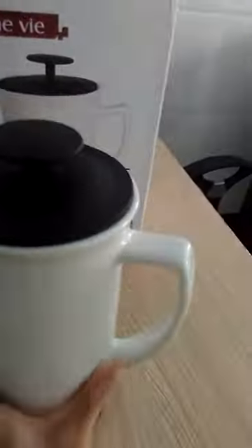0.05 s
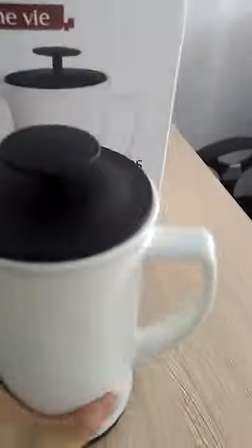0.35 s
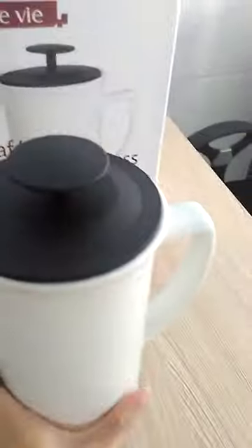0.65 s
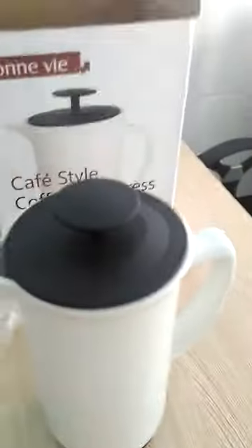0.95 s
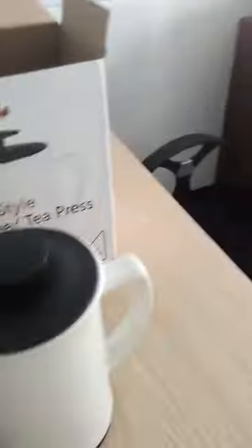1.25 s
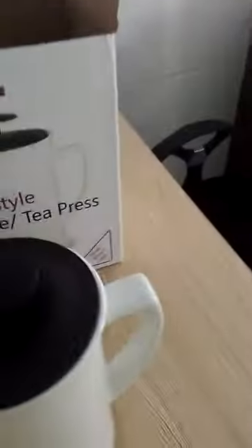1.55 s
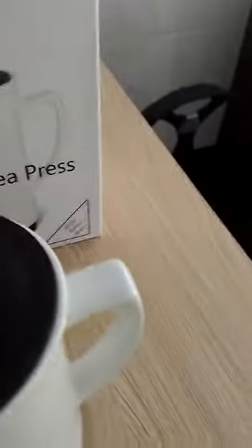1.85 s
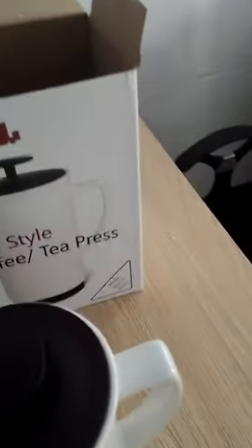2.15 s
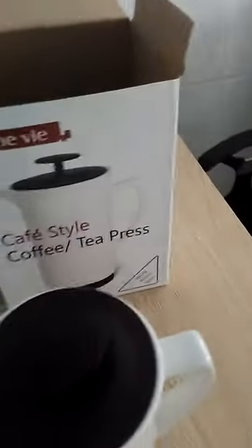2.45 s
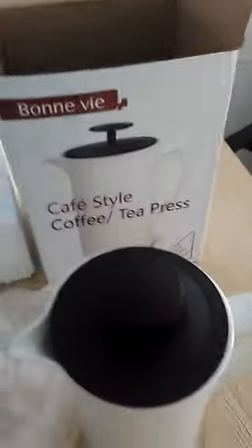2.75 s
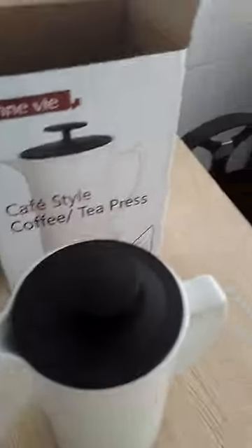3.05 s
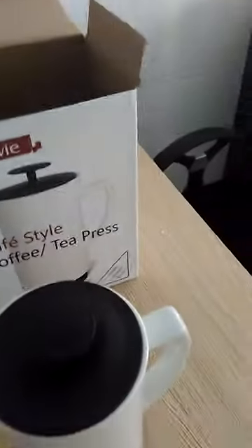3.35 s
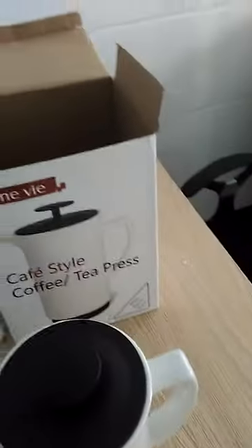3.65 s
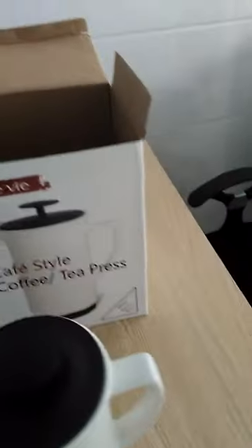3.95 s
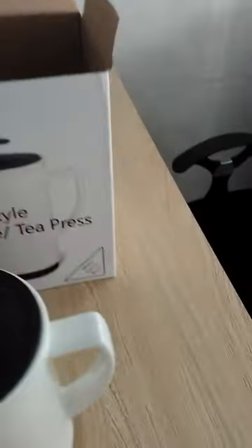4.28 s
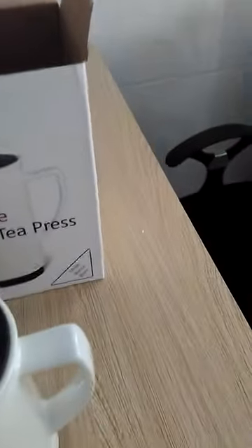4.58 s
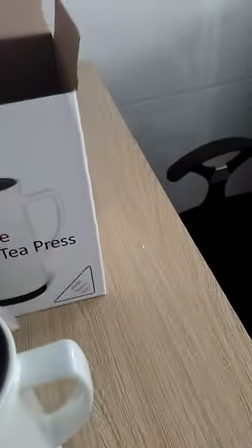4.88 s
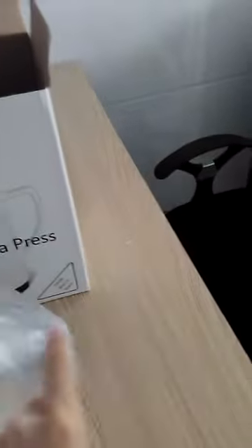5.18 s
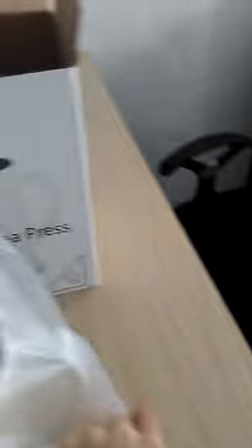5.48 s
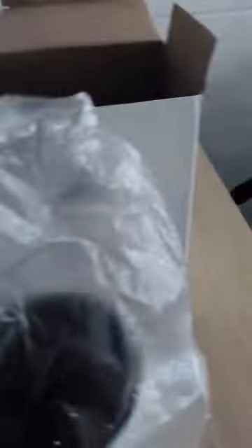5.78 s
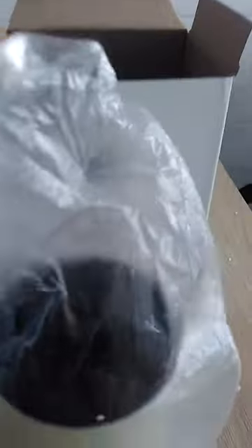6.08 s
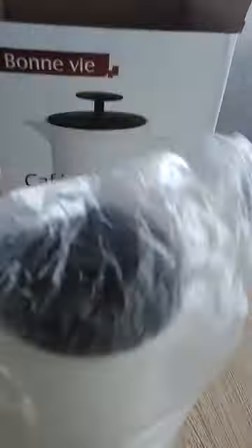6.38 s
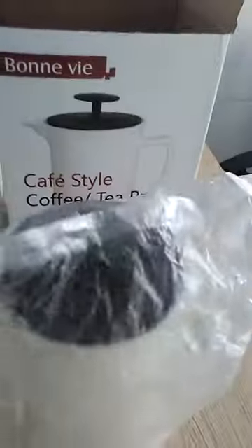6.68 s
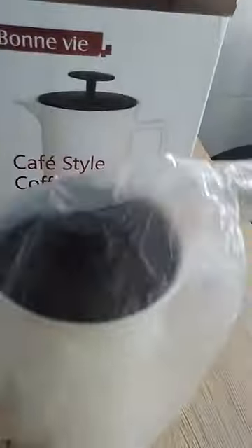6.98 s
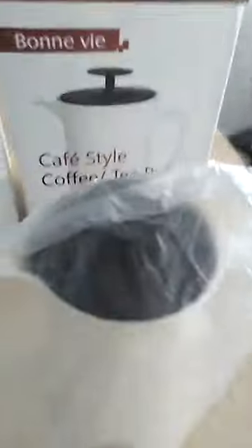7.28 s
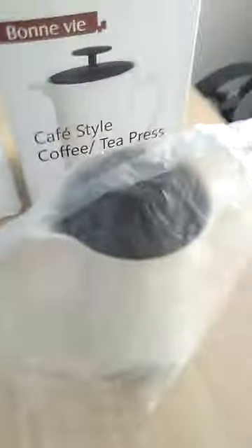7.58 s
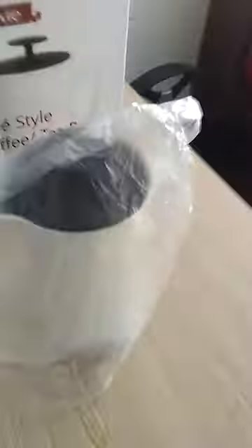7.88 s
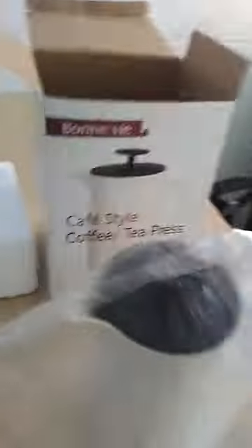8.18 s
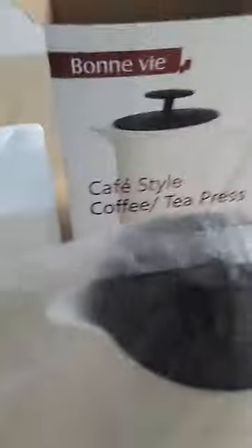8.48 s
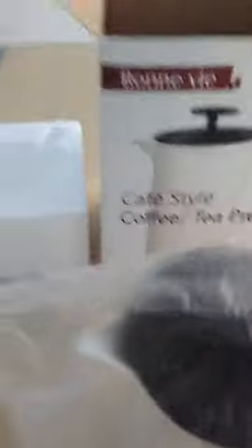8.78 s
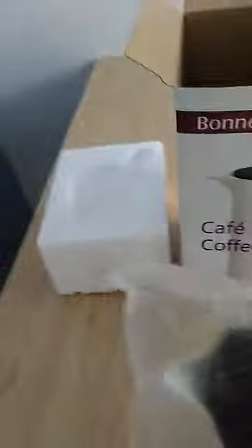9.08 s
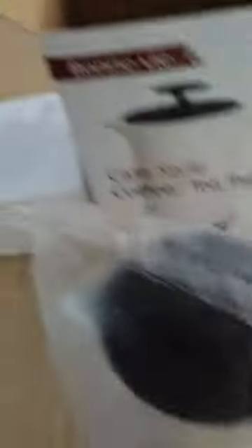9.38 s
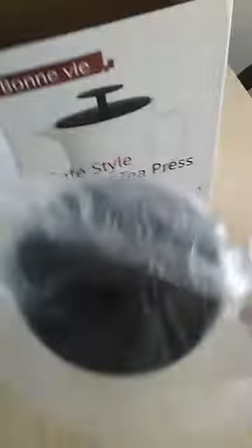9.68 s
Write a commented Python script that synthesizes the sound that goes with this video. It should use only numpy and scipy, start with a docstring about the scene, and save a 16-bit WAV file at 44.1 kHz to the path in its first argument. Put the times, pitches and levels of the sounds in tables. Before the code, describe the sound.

A thin plastic bag rustles close to a hand-held microphone in a small, quiet room. After a soft start and a light clack from a ceramic coffee press, it crinkles in repeated hissy pulls. The pot and lid knock lightly on a wooden table a few times. Late on, the plastic brushes the microphone's left side with two sharp snaps, then rustles on over faint handling rumble.

```python
"""A thin plastic bag is rustled and pulled over a ceramic coffee press, close to a hand-held microphone.
Tiny creases buckle into a hiss coloured by broad folds and a pocket of air; for a second the bag's loose
end brushes the left microphone port. Pot and lid knock lightly on a wooden table in a small room, and
the ceramic sings faintly under the film. The hand holding the recorder rumbles over the room tone."""
import sys
import numpy as np
from scipy import signal
from scipy.fft import rfft, irfft, next_fast_len
from scipy.io import wavfile

SR = 44100
rng = np.random.default_rng(int(sys.argv[2]) if len(sys.argv) > 2 else 0)


def persist_wave(psi):
    """Save psi, clipped to +-1, as 16-bit WAV."""
    counts = np.round(np.clip(psi, -1, 1) * 32767).astype(np.int16)
    wavfile.write(sys.argv[1], SR, np.atleast_2d(counts).T)


N = 433503
N_FFT, CONTROL_HOP = next_fast_len(N), 40
TIME_S = np.arange(N) / SR
CONTROL_S = TIME_S[::CONTROL_HOP]
BINS_HZ = np.maximum(np.arange(N_FFT // 2 + 1) * SR / N_FFT, 1)


# pulls on the bag: start_s, attack_s, hold_s, fall_db_per_s, level_db, fold_boost_db
PULLS = [(0.005, 0.013, 0.52, 102, -54, -5), (0.69, 0.21, 0.04, 8, -45, -10),
         (1.044, 0.03, 0.1, 47, -41, 1.5), (1.675, 0.058, 0.044, 162, -29.5, -12),
         (1.742, 0.045, 0.002, 36.5, -18.5, 4.5), (1.92, 0.093, 0.04, 121.5, -21, -1),
         (2.022, 0.17, 0.14, 36, -24.5, -1), (2.39, 0.075, 0.049, 60, -34.5, -3),
         (2.476, 0.1, 0.0036, 200, -21.5, -1), (2.592, 0.093, 0.2, 49.5, -21, 2),
         (2.703, 0.033, 0.025, 148, -20, -8), (2.902, 0.1, 0.019, 128, -21, -0.5),
         (3.058, 0.057, 0.055, 21, -24.5, 0), (3.14, 0.3, 0.06, 25.5, -25, -5),
         (3.667, 0.021, 0.078, 200, -39.5, 7.5), (3.934, 0.19, 0.007, 34.5, -28.5, -1),
         (4.24, 0.019, 0.00085, 204, -42, 7.5), (4.29, 0.33, 0.06, 75, -22.5, -6),
         (4.658, 0.063, 0.056, 107, -22.5, 3.5), (4.801, 0.041, 0.11, 100, -35.5, 5.5),
         (4.866, 0.37, 0.28, 163, -22.5, 3), (4.93, 0.071, 0, 150, -26.5, 1),
         (5.19, 0.034, 0.062, 150, -28, 2), (5.498, 0.17, 0.0044, 86, -23, 3),
         (5.772, 0.011, 0.017, 250, -26, -0.5), (5.845, 0.028, 0.0095, 211, -25.5, -4.5),
         (5.957, 0.021, 0.023, 120, -47.5, 17), (6.042, 0.22, 0.25, 128, -19, -0.5),
         (6.067, 0.02, 0.061, 302.5, -19.5, -0.5), (6.238, .025, 0.00024, 249, -24, 2),
         (6.388, 0.036, 0, 330, -17, 1.5), (6.746, 0.011, 0.155, 251, -27, -5),
         (6.795, 0.14, 0.0024, 60, -21, 5), (6.908, .04, 0.038, 200, -23.5, 8),
         (7.005, .02, 0.058, 299, -26, 2), (7.057, 0.14, 0, 137, -21, 1.5), (7.42, .05, 0.16, 40, -51, 4),
         (7.53, 0.35, 0.19, 154, -38, 4), (8.124, 0.031, 0.17, 89, -51, 9),
         (8.359, 0.0087, 0.046, 246, -33, -5), (8.383, 0.0093, 0.13, 87, -21.5, 4),
         (8.597, 0.02, 0.025, 78, -21.5, 5), (8.717, 0.14, 0.057, 163, -23, -2),
         (8.924, 0.086, 0.0093, 69, -17.5, 5.5), (9.098, 0.14, 0.0061, 127, -23, 8),
         (9.391, 0.016, 0, 29.5, -25, 4), (9.62, 0.1, 0, 121, -22, -2)]

def pulling(resting_db=-57.5):
    """Overlapping pulls add in power; returns the rustle's level and its boost from broad folds, in dB."""
    power = fold_power = from_db(resting_db) ** 2
    for start_s, attack_s, hold_s, fall_db_per_s, level_db, fold_boost_db in PULLS:
        pull = (from_db(level_db) * swell(start_s, attack_s, hold_s, fall_db_per_s)) ** 2
        power = power + pull
        fold_power = fold_power + pull * from_db(fold_boost_db) ** 2
    return per_sample(10 * np.log10(power)), per_sample(10 * np.log10(fold_power / power))


# film spectrum at the ports: freq_hz, left_db, right_db
FILM_SPECTRUM = [(151, -72, -72), (301, -24, -20), (540, -37.5, -44.5), (910, -26, -30.5),
                 (1290, -31, -37.5), (1960, -25, -33), (2730, -22, -25), (3600, -24, -23.5),
                 (5090, -17.5, -18), (7460, -12, -14), (8020, -10, -11.3), (10600, 3.5, -16.5),
                 (13350, -8, -23), (14200, -4.5, -22)]
# air pocket resonance, moving with the bag's shape: time_s, pitch_hz, prominence_db
AIR_POCKET = [(1.8, 2010, 5.5), (2.05, 2250, 2.5), (2.3, 2800, 2.5), (2.7, 2450, 1.5), (3.0, 2750, 1.5),
              (3.22, 2870, 6.5), (3.9, 2610, 5.5), (4.4, 2750, 4), (4.75, 2230, 1), (5.3, 2600, -2.5),
              (5.75, 2780, 2.5), (6.12, 2100, 1.5), (6.37, 2100, 0), (6.43, 2030, 10), (6.56, 2060, 9),
              (7.0, 2400, -2), (8.45, 2200, 5.5), (9.05, 2400, 0.5), (9.7, 2000, 0)]
# bag's lean towards the left port: time_s, right_loss_db
BAG_LEAN = [(0, 3.5), (2.4, 0), (4.2, -2.5), (6.9, -2), (7.35, 0.5), (7.55, 15), (8.1, 9.5), (8.4, 0.5),
            (9.8, 2.5)]
BANDS_HZ = np.r_[500, 750, np.geomspace(950, 5400, 26), 6300, 8000, 10500, 13500]

def bag_rustle(flicker_db, fold_flicker_db, flutter_db, fold_hz, firm_pull_db=-26.5, pocket_octaves=0.11):
    """Dense buckling merges into hiss; folds open and close, so middle bands swell and fade separately."""
    level_db, fold_boost_db = pulling()
    right_loss_db, = in_time(BAG_LEAN)
    pocket_hz, prominence_db = in_time(AIR_POCKET)
    creases_per_s = 30000 * from_db(0.3 * (level_db - firm_pull_db))   # harder pulls buckle more creases
    creases = np.array([buckles(creases_per_s, spread_db=-1.9) for port in range(2)])
    creases /= np.sqrt(np.minimum(creases_per_s, SR))   # level independent of rate
    film = rfft(at_ports(creases, FILM_SPECTRUM).astype(np.float32), N_FFT)
    log_bins = np.log(np.linspace(1, SR / 2, film.shape[1]))
    rustle = 0
    for band_hz, selector in zip(BANDS_HZ, np.eye(len(BANDS_HZ))):
        triangle = np.interp(log_bins, np.log(BANDS_HZ), selector).astype(np.float32)
        band = irfft(film * triangle, N_FFT)[:, :N]
        fold_share = np.exp(-np.log(band_hz / fold_hz) ** 2)
        pocket_db = prominence_db / (1 + (np.log2(band_hz / pocket_hz) / pocket_octaves) ** 2)
        wander_db = (flicker_db + fold_share * fold_flicker_db) * drift(14.4)
        rustle = rustle + band * from_db(pocket_db + fold_share * fold_boost_db + wander_db)
    return rustle * balance(-right_loss_db) * from_db(level_db + flutter_db * drift(28))


# strokes of film over the left port: start_s, end_s, level_db
STROKES = [(7.39, 7.433, -27), (7.442, 7.534, -32), (7.518, 7.614, -50), (7.599, 7.634, -38.5),
           (7.629, 7.67, -32), (7.642, 7.657, -33), (7.667, 7.722, -41.5), (7.687, 7.718, -35.5),
           (7.723, 7.768, -35), (7.778, 7.912, -32.5), (7.881, 7.94, -26), (7.942, 7.985, -34),
           (8.024, 8.05, -33), (8.05, 8.103, -40.5), (8.159, 8.208, -39), (8.237, 8.31, -41)]
# catches on the port's rim: middle_s, half_length_s, level_db
RASPS = [(7.395, 0.0013, -22), (7.4148, .001, -25.5), (7.589, 0.0013, -33), (7.649, .0015, -27.5),
         (7.659, .004, -32), (7.694, 0.0018, -33)]
# sliding film spectrum: freq_hz, level_db
SLIDE_SPECTRUM = [(300, -13.5), (1000, -22), (2000, -19.5), (2800, -21.5), (3600, -11.5), (4150, -12),
                  (4700, -17), (6600, -15), (8500, -6.5), (10500, 3.5), (12500, 0), (14000, -3.5)]

def port_brushing(scratch_db):
    """Film slides over the port in swelling strokes and catches on its rim in short rasps."""
    pressure = sum(from_db(db) * bump(middle_s, half_length_s) for middle_s, half_length_s, db in RASPS)
    for start_s, end_s, level_db in STROKES:
        progress = np.clip((TIME_S - start_s) / (end_s - start_s), 0, 1)
        pressure += from_db(level_db) * np.sqrt(np.sin(np.pi * progress).clip(0))
    creases = rfft(buckles(per_s=30000, spread_db=-1.0), N_FFT)
    slide = unit_rms(irfft(creases * from_db(at_bins(SLIDE_SPECTRUM)[0]), N_FFT)[:N])
    return pressure * from_db(scratch_db * drift(56)) * slide


# creases snapping at the port: time_s, level_db
SNAPS = [(7.6004, -31), (7.6145, -23), (7.738, -25), (7.792, -27), (7.836, -21), (7.9357, 5), (8.035, 2.5),
         (8.0714, -27)]
# crease modes: pitch_hz, level_db, t60_s
CREASE_MODES = [(1840, -22.5, 0.0029), (3550, -32, 0.0084), (4050, -30.5, 0.022), (5200, -12, 0.0011),
                (8700, -3.5, 0.0014), (10700, -1, 0.0016), (13300, -6.5, .0009)]

def port_snaps(low_cut_hz=1340):
    """Single creases snap right at the port and ring briefly."""
    low_cut = signal.butter(2, low_cut_hz, "high", fs=SR, output="sos")
    return signal.sosfilt(low_cut, ring(impulses(*np.transpose(SNAPS)), CREASE_MODES))


# bumps on the port: time_s, level_db, pitch_hz, t60_s
PUFFS = [(7.3969, -27, 350, 0.017), (7.397, -20, 1451, 0.0033), (7.397, -19.5, 3640, 0.012),
         (7.6145, -40, 2100, 0.0033), (7.702, -31.5, 63.3, 0.3), (7.746, -32, 124, 0.072),
         (7.887, -32.5, 129, 0.026), (7.893, -31, 3900, .008), (7.9013, -30, 2000, 0.0046),
         (7.903, -21.5, 5200, .005), (7.911, -27, 4300, .006), (7.921, -30, 3700, .006),
         (7.9487, -29, 2300, 0.0071), (7.96, -29, 170, 0.018), (7.962, -33, 3600, .005),
         (7.968, -35, 5000, .004)]

def port_puffs():
    """Film bumps the port and pushes air into it, one damped sine per bump."""
    return sum(ring(impulses(time_s, db), [(hz, 0, t60_s)]) for time_s, db, hz, t60_s in PUFFS)


# pot's base on the table: time_s, level_db, favoured_hz, room_send_db
THUDS = [(1.352, -44, 400, -8), (1.785, -37.5, 330, -10), (1.8, -35, 260, -8), (5.7064, -30, 380, -5),
         (5.719, -32, 386, -2.5), (5.742, -40, 402.6, -3), (5.778, -45, 402.6, -6), (5.83, -47, 350, -4)]
# table top modes: pitch_hz, level_db, t60_s
TABLE_MODES = [(192, -4.5, 0.07), (264, 1.5, 0.037), (327, 0, 0.15), (415, -3, 0.067), (476, -5, 0.11),
               (524, -5, 0.049), (594, -1.5, 0.047), (855, -0.5, 0.03), (1055, -7.5, 0.032)]

def table_thuds():
    """The pot's base sets the wooden top ringing dully."""
    return in_room(*strike(THUDS, TABLE_MODES, focus_db_per_octave=2.5), right_db=-7)


# pot and lid clacks: time_s, level_db, favoured_hz, room_send_db
CLACKS = [(1.3518, -27.5, 960, -5.5), (1.367, -39, 800, -5), (1.369, -39, 3400, -2), (1.383, -38, 650, -5),
          (1.431, -39.5, 1269, -2.5), (1.468, -40, 450, -6), (2.506, -38.5, 2000, -3),
          (2.619, -30, 720, -5), (2.633, -39.5, 1800, 3), (8.21, -38.5, 1990, 1)]
# modes of the pot with its plastic lid: pitch_hz, level_db, t60_s
POT_MODES = [(252, -1, 0.023), (340, -2, 0.046), (437, -1, 0.025), (714, 1.5, 0.022), (876, -2.5, 0.028),
             (1080, 5, 0.012), (1264, 2.5, 0.016), (1810, 3.5, 0.0082), (2500, 2, 0.012), (2880, 0, 0.016),
             (3500, 4, 0.0065)]

def pot_clacks():
    """Light, hard contacts ring pot and lid."""
    return in_room(*strike(CLACKS, POT_MODES, focus_db_per_octave=5.5), right_db=-10)


def ceramic_singing(pitch_hz, level_db):
    """One wavering mode of the ceramic wall swells and fades under the sliding film."""
    envelope = per_sample(swell(start_s=9.2, attack_s=0.076, hold_s=0.1, fall_db_per_s=36))
    phase = 2 * np.pi * np.cumsum(pitch_hz + 13 * drift(35.9)) / SR
    return envelope * from_db(level_db + 4.8 * drift(21.8)) * np.sin(phase) * balance(-7)


# hand shifts on the recorder: middle_s, half_length_s, sway_db, grip_db
HAND_SHIFTS = [(0.01, 0.094, -43, -40.5), (0.212, 0.054, -40, -50), (0.547, 0.091, -33.5, -31.5),
               (0.697, 0.35, -43, -48), (1.23, .04, -49, -62), (1.36, 0.033, -38, -65),
               (1.54, .04, -53, -59), (1.824, 0.065, -49, -41), (2.63, .04, -54, -62),
               (2.96, 0.036, -54, -63.5), (3.42, 0.056, -47, -68), (3.66, 0.1, -42.5, -74),
               (4.02, .1, -51, -49.5), (4.35, 0.069, -43, -55), (5.26, 0.05, -49, -49),
               (5.721, 0.05, -56, -51), (5.95, 0.078, -48, -62), (6.812, 0.055, -51, -62),
               (7.01, 0.065, -54, -53), (7.45, 0.14, -51.5, -60), (7.952, 0.086, -44, -49),
               (8.32, .03, -48, -58), (8.46, 0.089, -41, -45.5), (9.3, 0.056, -48, -72)]
# sway spectrum: freq_hz, level_db
SWAY_SPECTRUM = [(15, -52), (30, -24), (48, 1), (62, -8), (85, -3.5), (120, -23), (250, -54), (1000, -88)]
# grip rubbing spectrum: freq_hz, level_db
GRIP_SPECTRUM = [(50, -28), (85, 1.5), (118, 6.5), (160, -9), (230, -3.5), (340, -13), (500, -35),
                 (1500, -80)]

def hand_rumble(sway_lumps_db, grip_lumps_db, tremor_db=-54, settling_db_per_s=0.6):
    """A calming tremor and lumpy shifts of sway and rubbing reach the microphone through its case."""
    sway_power = from_db(tremor_db - settling_db_per_s * TIME_S) ** 2
    grip_power = 0
    for middle_s, half_length_s, sway_db, grip_db in HAND_SHIFTS:
        shift = bump(middle_s, half_length_s)
        sway_power += (from_db(sway_db) * shift) ** 2
        grip_power += (from_db(grip_db) * shift) ** 2
    sway = np.sqrt(sway_power) * from_db(sway_lumps_db * np.tanh(drift(6.5))) * noise(SWAY_SPECTRUM)
    grip = np.sqrt(grip_power) * from_db(grip_lumps_db * drift(60)) * noise(GRIP_SPECTRUM)
    return (sway + grip) * balance(-1.5)


# room tone spectrum: freq_hz, left_db, right_db
ROOM_SPECTRUM = [(25, -24, -24), (93, -6.5, -6), (147, 0, -1), (231, 4, 1), (287, 0.5, -4.5), (326, 5, -1),
                 (375, -1, -7), (670, -1.5, -3.5), (1130, -10, -15.5), (1920, -10.5, -15.5),
                 (2600, -17, -23), (3940, -33.5, -26), (8150, -20.5, -54), (14000, -19, -47)]
# room tone level: time_s, level_db
ROOM_LEVEL = [(0, -51), (.9, -51), (1.6, -53.5), (4.2, -54), (8.2, -55.5), (9.83, -58.5)]

def room_tone(waver_db):
    """Faint, low noise that wavers and slowly sinks."""
    return from_db(in_time(ROOM_LEVEL)[0] + waver_db * drift(8.9)) * noise(ROOM_SPECTRUM)


# likeness of left and right: freq_hz, correlation
PORT_CORRELATION = [(120, -.985), (280, -.83), (550, -.6), (1100, -.12), (2200, 0)]

def at_ports(pair, spectrum):
    """Two unrelated signals become coloured left and right; the ports hear the bass in opposite phase."""
    mid, side = rfft(pair.astype(np.float32), N_FFT)
    correlation, = at_bins(PORT_CORRELATION)
    ports = np.sqrt(1 + correlation) * mid + np.sqrt(1 - correlation) * side * [[1], [-1]]
    return unit_rms(irfft(ports * from_db(at_bins(spectrum)), N_FFT)[:, :N])


def buckles(per_s, spread_db):
    """Tiny creases give way at random, as impulses of uneven size."""
    sizes = from_db(spread_db * np.minimum(rng.exponential(1, N), 5)) * rng.standard_normal(N)
    return sizes * (rng.random(N) < per_s / SR)


def strike(blows, modes, focus_db_per_octave):
    """Modes near a blow's favoured pitch ring most; returns the direct sound and the room send."""
    time_s, level_db, favoured_hz, send_db = np.transpose(blows)
    ringing = 0
    for k, mode in enumerate(modes):
        strength_db = level_db - focus_db_per_octave * np.abs(np.log2(mode[0] / favoured_hz))
        hits = np.array([impulses(time_s, strength_db), impulses(time_s, strength_db + send_db)])
        ringing = ringing + (-1) ** k * ring(hits, [mode])
    return ringing


def ring(hits, modes):
    """Impulses set damped sines ringing; neighbouring modes swing in opposite directions."""
    ringing = 0
    for k, (pitch_hz, level_db, t60_s) in enumerate(modes):
        radius, angle = from_db(-60 / (t60_s * SR)), 2 * np.pi * pitch_hz / SR
        feedback = [1, -2 * radius * np.cos(angle), radius ** 2]
        sine = signal.lfilter([0, np.sin(angle)], feedback, hits + 1e-18)
        ringing = ringing + (-1) ** k * from_db(level_db) * sine
    return ringing


def in_room(direct, send, right_db, t60_s=0.56, spread=0.64):
    """A knock arrives directly, inverted at the right port, then as a dying wash of reflections."""
    age_s = TIME_S[:SR]
    tails = rng.standard_normal((2, SR)) * from_db(-60 * age_s / t60_s) * (age_s > 0.004)
    tails /= np.sqrt(np.sum(tails ** 2, axis=1, keepdims=True))
    opposed, in_phase = signal.fftconvolve(send[None], tails, axes=1)[:, :N]
    return ((direct + opposed) * [[1], [-1]] + spread * in_phase) * balance(right_db)


def noise(spectrum):
    """Coloured stereo noise."""
    return at_ports(rng.standard_normal((2, N)), spectrum)


def impulses(time_s, level_db):
    """One-sample clicks."""
    return np.bincount(np.round(np.atleast_1d(time_s) * SR).astype(int), np.atleast_1d(from_db(level_db)), N)


def swell(start_s, attack_s, hold_s, fall_db_per_s):
    """Linear rise to 1, hold, steady fall in dB; on the control clock."""
    age_s = CONTROL_S - start_s
    falling_s = np.maximum(age_s - attack_s - hold_s, 0)
    return np.clip(age_s / attack_s, 0, 1) * from_db(-np.minimum(falling_s * fall_db_per_s, 120))


def bump(middle_s, half_length_s):
    """Gaussian rise to 1 and back."""
    return np.exp(-np.minimum(((TIME_S - middle_s) / half_length_s) ** 2, 20))


def drift(rate_hz):
    """Smooth random wander, rms 1."""
    pole, warm_up = np.exp(-2 * np.pi * rate_hz * CONTROL_HOP / SR), 2000
    white = rng.standard_normal(N // CONTROL_HOP + 2 + warm_up)
    slow = signal.lfilter([1], [1, -2 * pole, pole * pole], white)[warm_up:]
    return np.interp(np.arange(N) / CONTROL_HOP, np.arange(len(slow)), unit_rms(slow))


def per_sample(control):
    """Control clock to audio rate."""
    return np.interp(TIME_S, CONTROL_S, control)


def in_time(rows):
    """Each column of a curve at every sample."""
    time_s, *columns = np.transpose(rows)
    return [np.interp(TIME_S, time_s, column) for column in columns]


def at_bins(rows):
    """Each column of a spectrum at every frequency bin."""
    freq_hz, *columns = np.transpose(rows)
    return np.array([np.interp(np.log(BINS_HZ), np.log(freq_hz), column) for column in columns])


def balance(right_db):
    """Stereo gains, left at unity."""
    return from_db(np.vstack([np.zeros_like(right_db), right_db]))


def unit_rms(x):
    """Scale so that the first channel has rms 1."""
    return x / np.sqrt(np.mean(np.atleast_2d(x)[0] ** 2) + 1e-20)


def from_db(db):
    """Decibels to gain."""
    return np.exp(np.asarray(db) * (np.log(10) / 20))


def scene():
    """Bag, pot and hand over the room tone."""
    room = room_tone(waver_db=2.16)
    bag = bag_rustle(flicker_db=0.73, fold_flicker_db=3.0, flutter_db=0.57, fold_hz=2250)
    left_port = (port_brushing(scratch_db=1.5) + port_snaps() + port_puffs()) * balance(-40)
    pot = table_thuds() + pot_clacks() + ceramic_singing(pitch_hz=1324, level_db=-61)
    hand = hand_rumble(sway_lumps_db=5.0, grip_lumps_db=1.5)
    return bag + left_port + pot + hand + room


def record(dry):
    """The sharpest snaps overload the input, and the top is cut steeply."""
    cutoff_hz = 14190
    low_pass = signal.ellip(12, 0.1, 80, cutoff_hz, fs=SR, output="sos")
    return signal.sosfilt(low_pass, np.clip(dry, -0.85, 0.85))


dry = scene()
out = record(dry)
persist_wave(out)
```